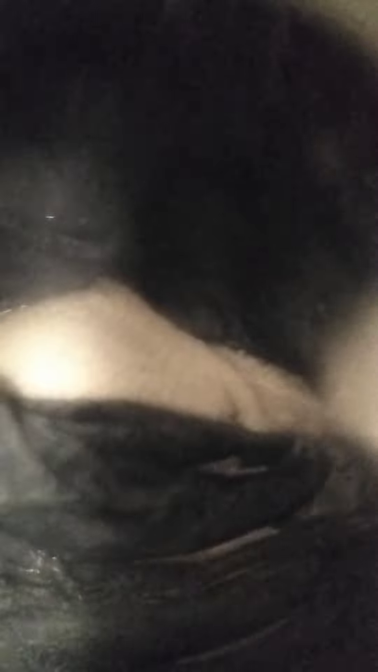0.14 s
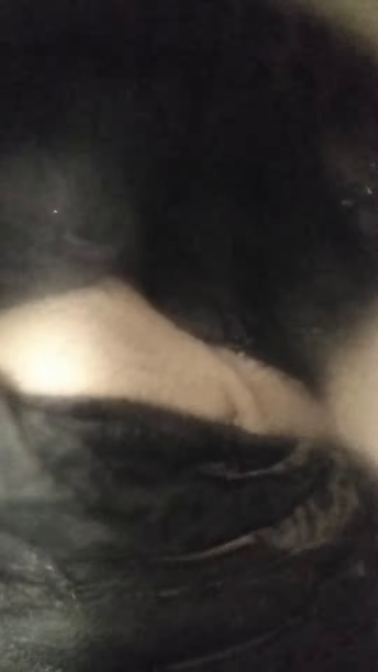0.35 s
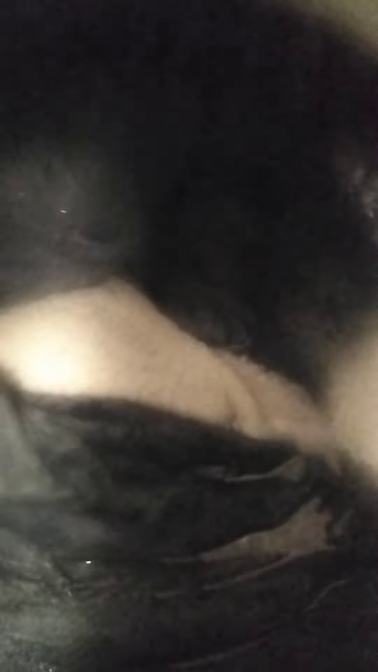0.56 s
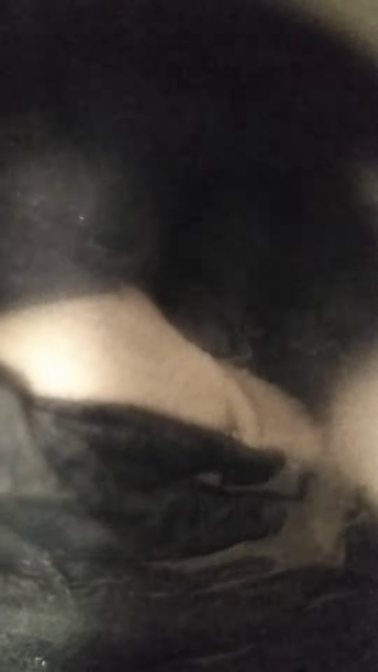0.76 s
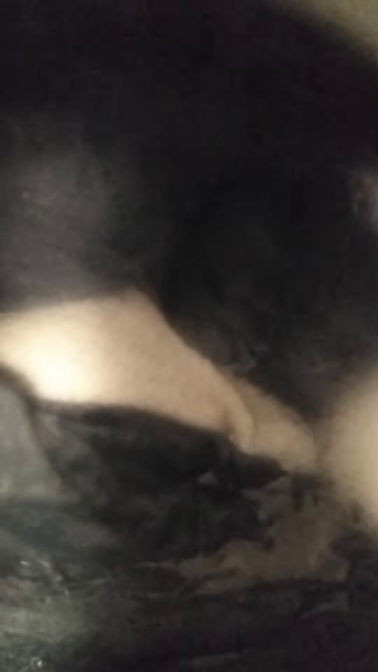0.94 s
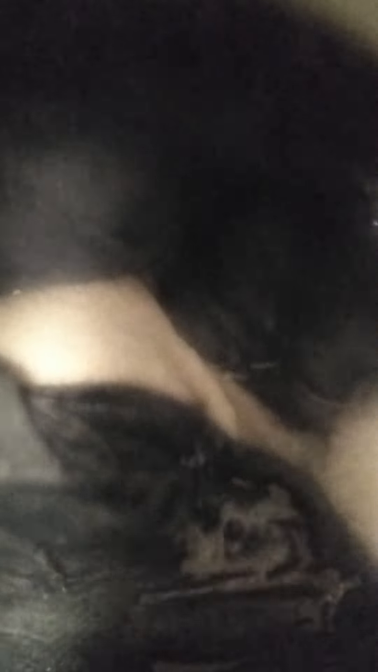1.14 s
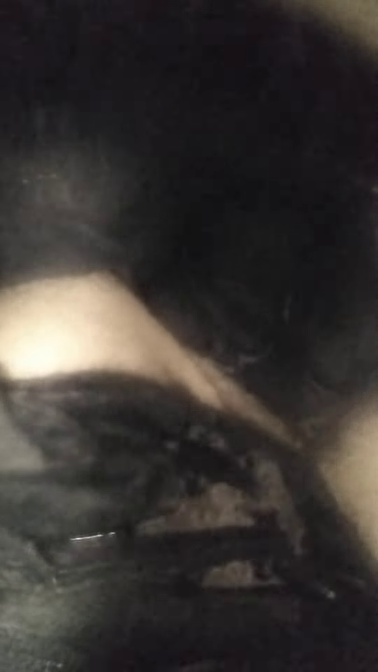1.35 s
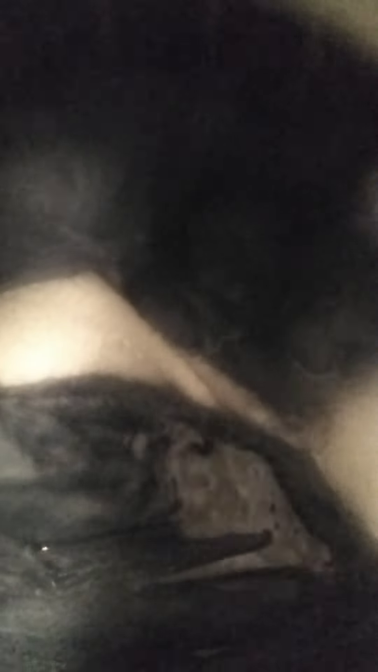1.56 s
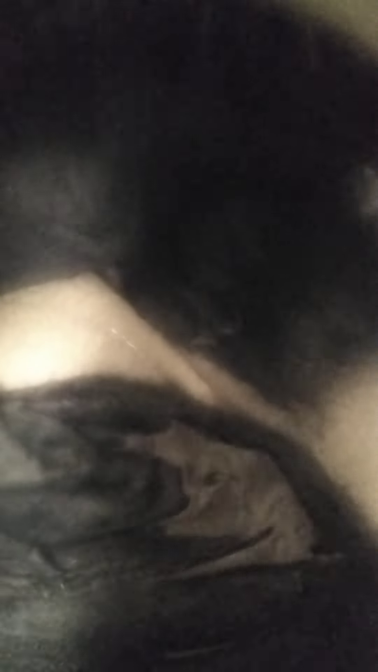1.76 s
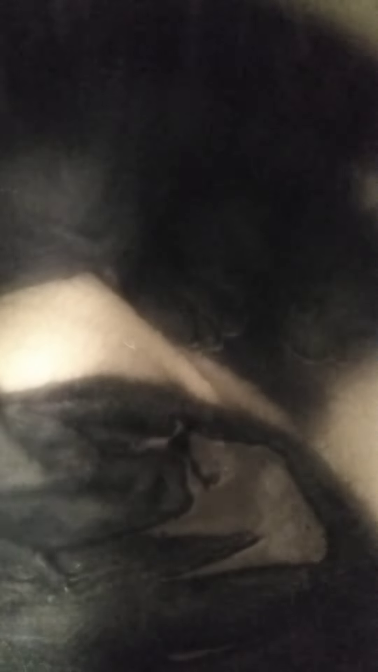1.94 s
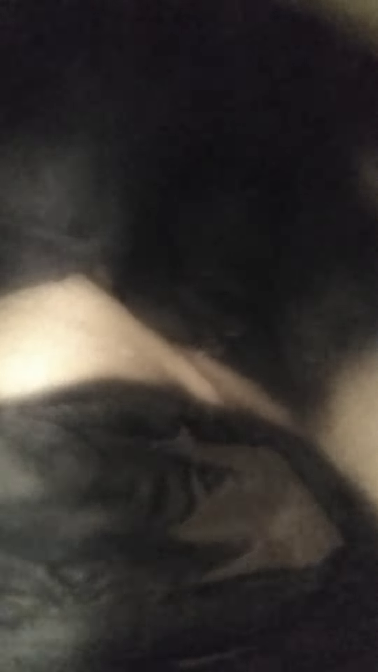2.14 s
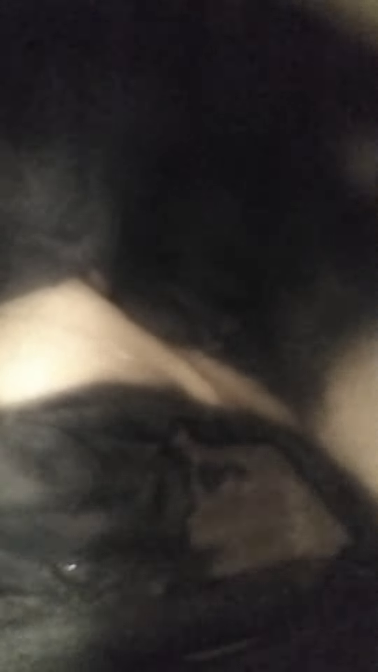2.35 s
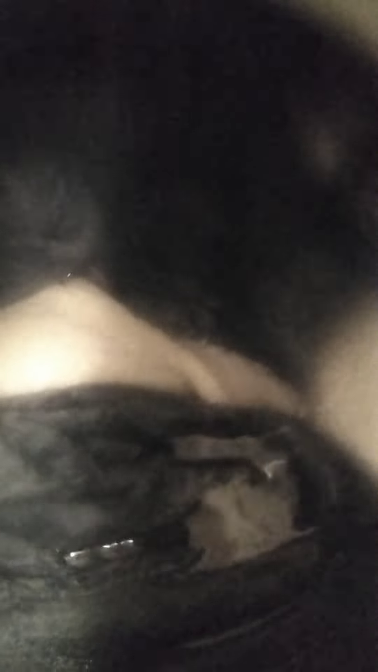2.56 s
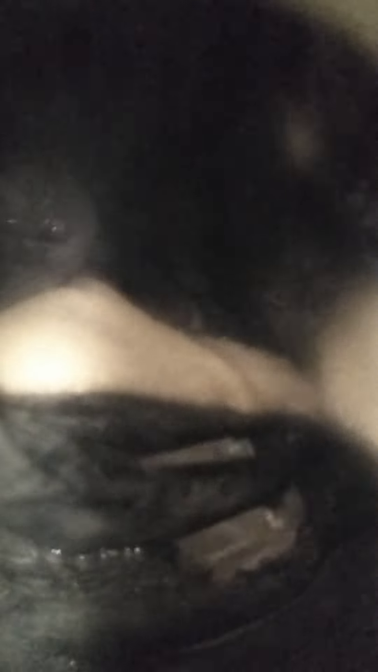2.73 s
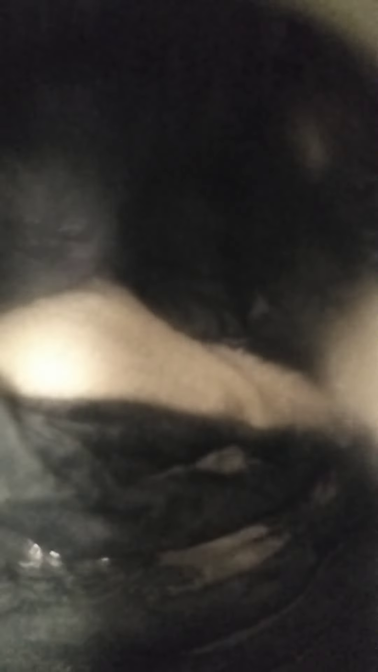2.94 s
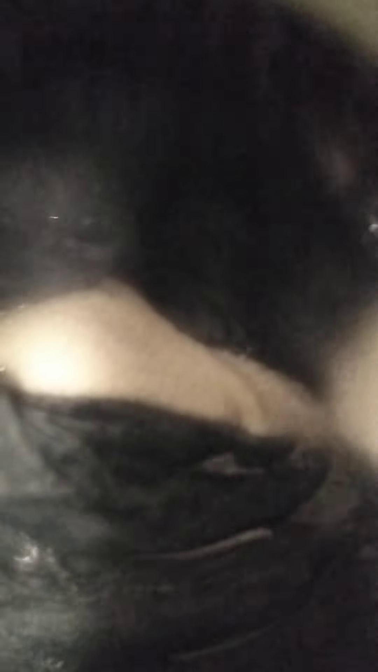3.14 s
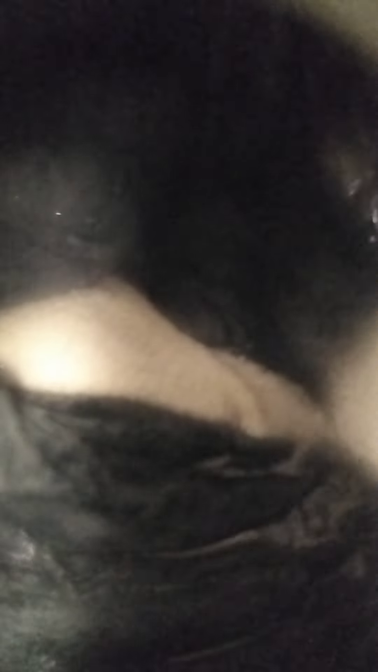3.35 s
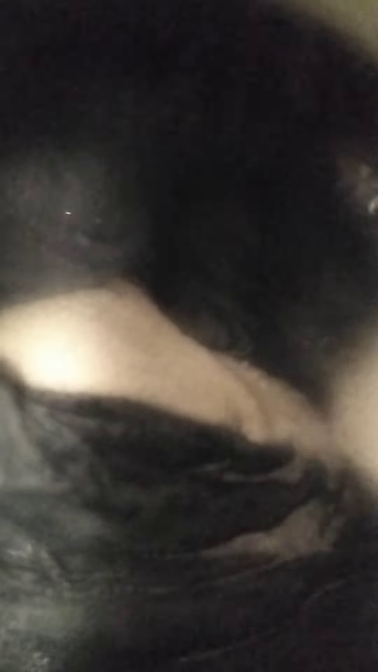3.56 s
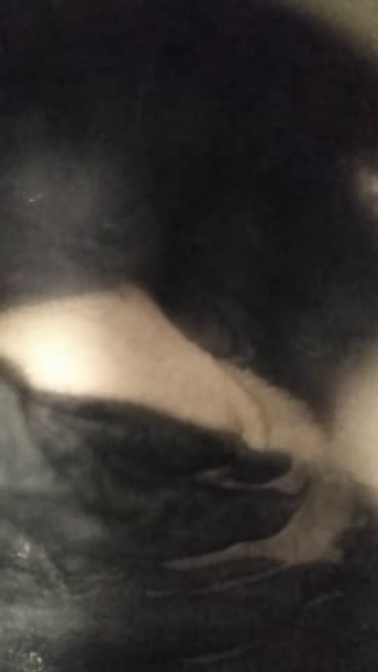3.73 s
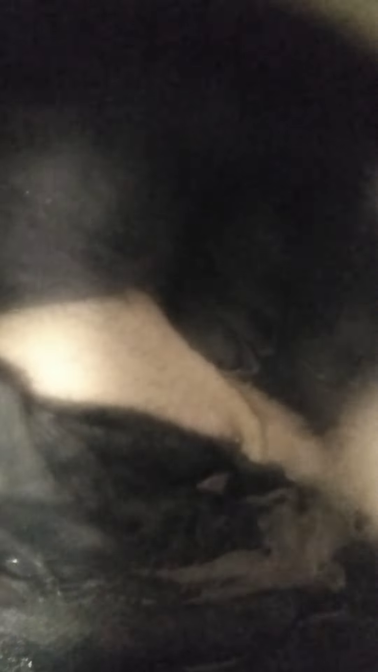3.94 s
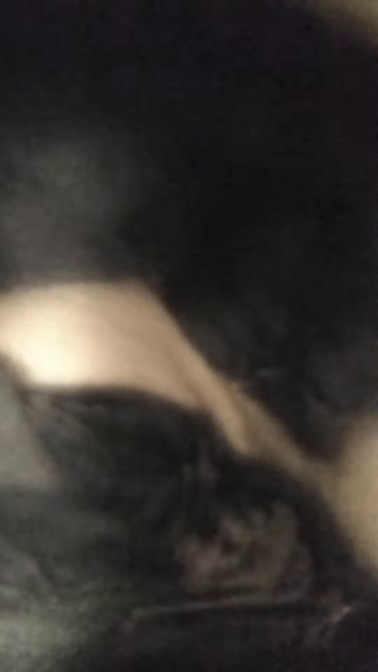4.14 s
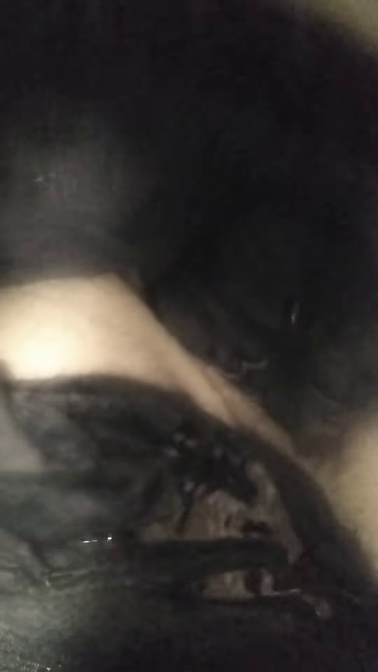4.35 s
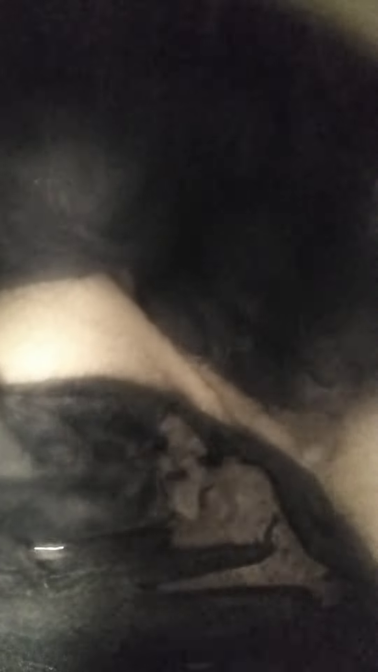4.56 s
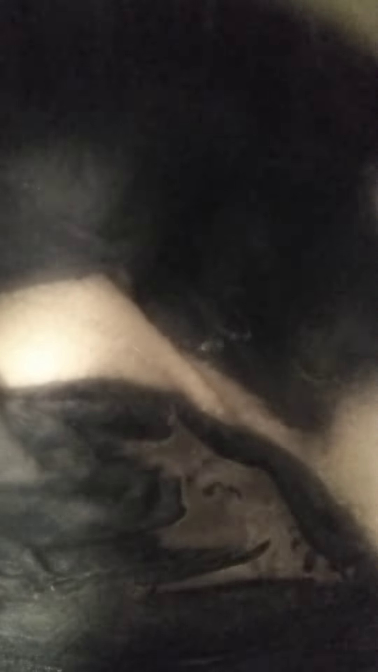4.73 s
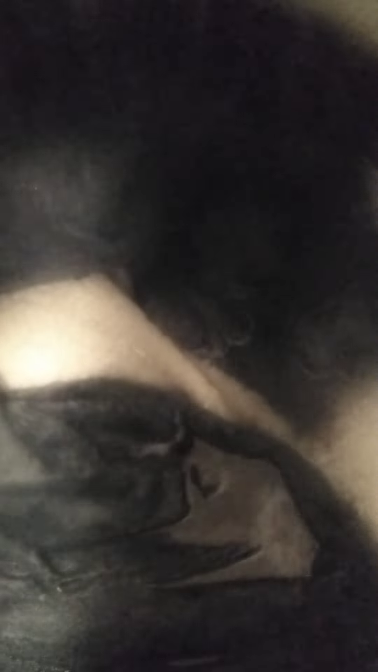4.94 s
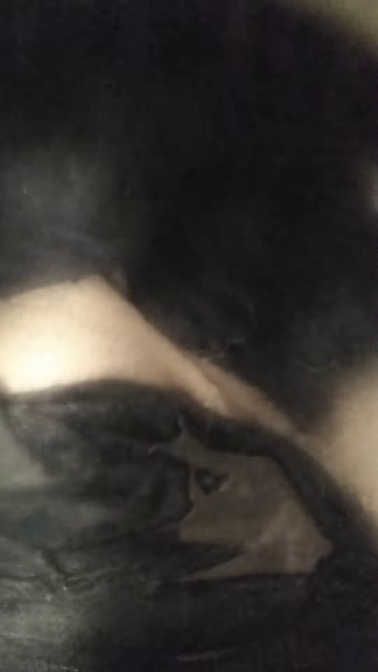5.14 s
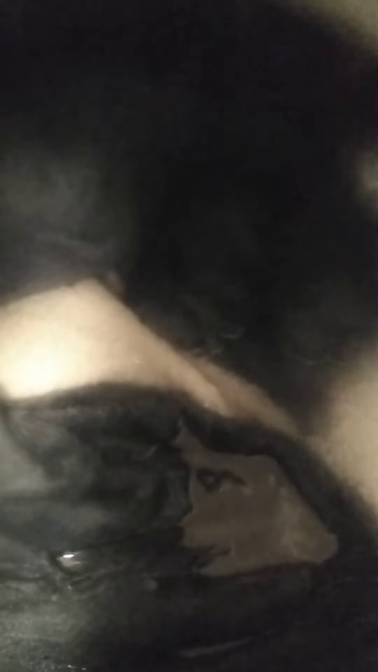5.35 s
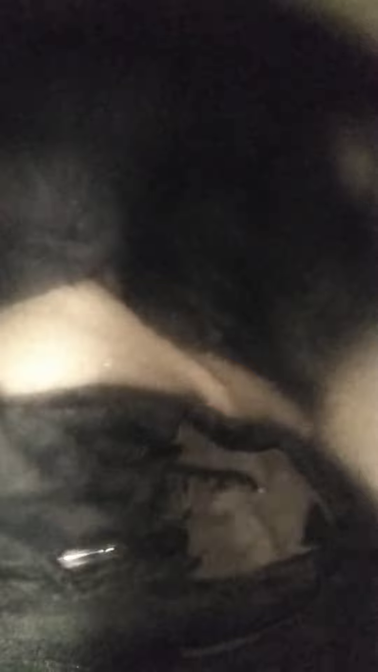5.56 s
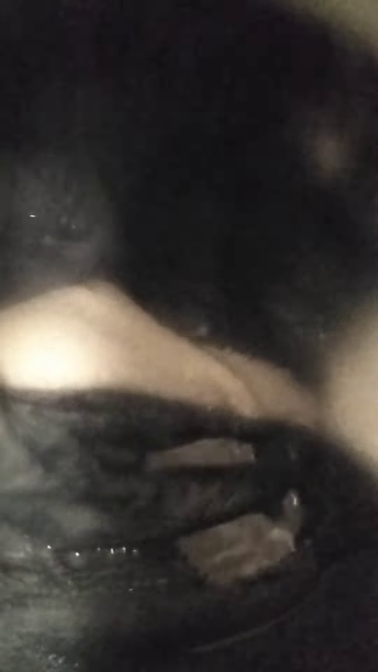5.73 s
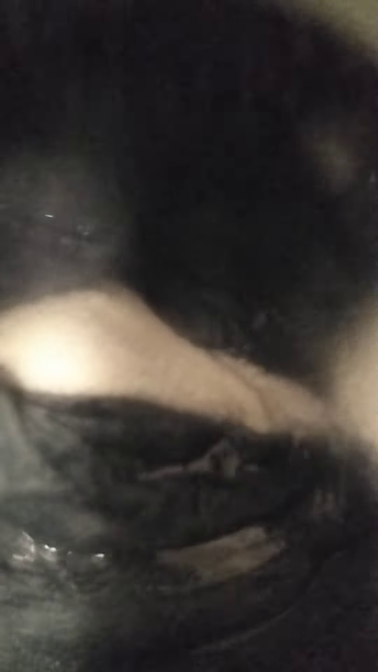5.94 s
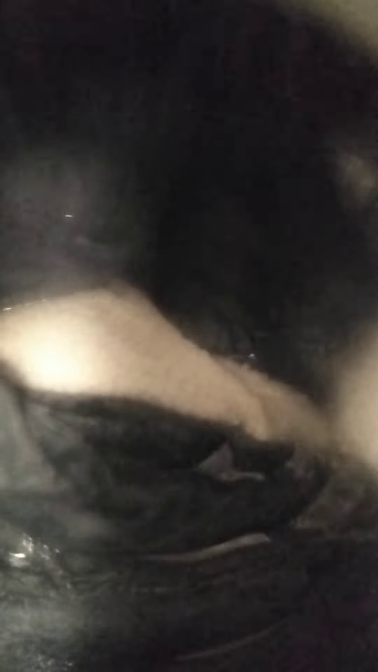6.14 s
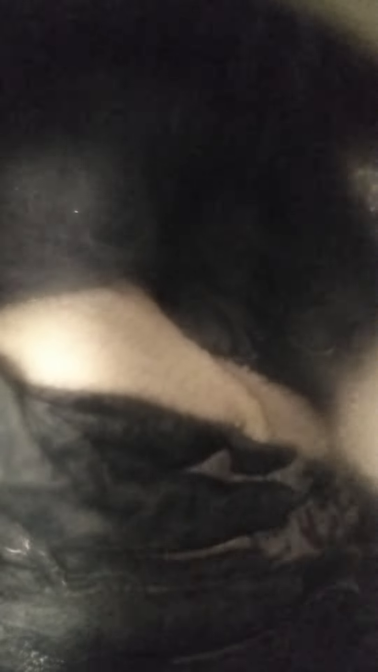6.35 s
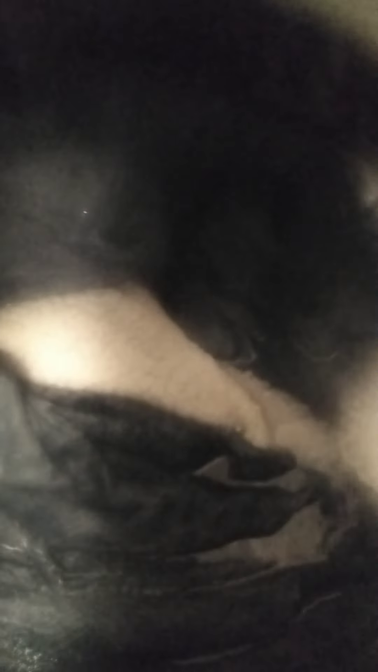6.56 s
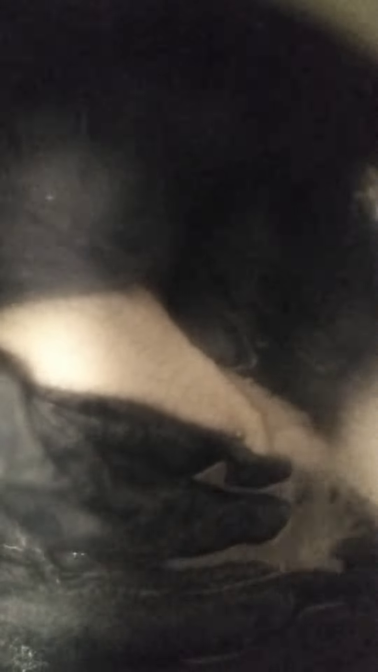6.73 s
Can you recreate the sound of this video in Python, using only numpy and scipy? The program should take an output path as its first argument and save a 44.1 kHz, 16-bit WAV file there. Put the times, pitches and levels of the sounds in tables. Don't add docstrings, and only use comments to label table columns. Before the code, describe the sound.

A washing machine agitates a heavy soaked blanket, heard very close at the lid. About every one and a half seconds the drive knocks in, water and cloth churn in the metal tub with a short hollow moan, the drive clunks out and the load slops to a halt. Drops then plink in the wet drum over a faint low hum.

```python
import sys
import numpy as np
from scipy import signal
from scipy.fft import rfft, irfft
from scipy.io import wavfile
from scipy.ndimage import uniform_filter1d

SR = 44100
rng = np.random.default_rng(int(sys.argv[2]) if len(sys.argv) > 2 else 0)


def gain_from_decibels(decibels):
    exponent = np.asarray(decibels, float) / 20
    return 10 ** exponent


def pcm_store(signal):
    levels = np.round(np.clip(np.atleast_2d(signal), -1, 1) * 32767)
    wavfile.write(sys.argv[1], SR, levels.astype(np.int16).T)


N = 303849
t = np.arange(N) / SR
STOP_S = 0.668
LOAD_LAG_S = 0.07
LURCH_T60_S, AIR_T60_S = 0.9, 0.3
PORT_LAG = 12


def walk(rate):
    k = int(SR / rate)
    held = np.repeat(rng.standard_normal(N // k + 1), k)
    return 1.302 * uniform_filter1d(uniform_filter1d(held, k), k)[:N]


def band(x, lo_hz, hi_hz):
    return signal.sosfilt(signal.butter(3, [lo_hz, hi_hz], "band", fs=SR, output="sos"), x)


def unit(x):
    return x / np.std(np.mean(x, axis=0))


def pair(alike):
    common, left, right = rng.standard_normal((3, N))
    shared = np.array([np.roll(common, PORT_LAG), common])
    return np.sqrt(alike) * shared + np.sqrt(1 - alike) * np.array([left, right])


# resonance in Hz, width in Hz, left lift in dB, right lift in dB.
PANELS = [(110.8, 25, 8.5, 11), (186, 29, -0.5, -1.5), (379.5, 25, 14.5, 4), (508.4, 27, -1.5, 6.5),
          (588, 17, 4.5, 4), (691, 27.3, 13, 9.5), (780, 28, 1.5, 0), (980, 30, 3.5, -3),
          (1075.5, 45, 7.5, 6.5), (1240, 40, 2.5, 1.5), (1434, 18, 6.5, 7), (1953, 50, 9.5, 3.5),
          (2390, 50, 5.5, 0), (3670, 46, 7.5, 7), (5640, 110, 9, 15), (6230, 110, 0, 11)]


def body(x, colour, panel_share=1.0):
    size = 2 ** 15
    hz = np.arange(size // 2 + 1) * SR / size + 1
    f, *sides = np.transpose(colour)
    db = np.array([np.interp(np.log(hz), np.log(f), side) for side in sides])
    for centre, width, *lift in PANELS:
        db = db + panel_share * np.outer(lift, 1 / (1 + (2 * (hz - centre) / width) ** 2))
    cepstrum = irfft(db * np.log(10) / 20, size)
    fold = np.r_[1, 2 * np.ones(size // 2 - 1), 1, np.zeros(size // 2 - 1)]
    response = irfft(np.exp(rfft(cepstrum * fold)), size)[:, :size // 2]
    return signal.fftconvolve(x, response, axes=1)[:, :N]


# motor on in seconds, load lurches in seconds, lurch in dB, slop at the stop in dB.
STROKES = [
    (-1.08, -1.15, -60, 0),
    (0.42, 0.345, -53, 0),
    (1.921, 1.885, -60, 0),
    (3.422, 3.35, -44.5, 0),
    (4.923, 4.8, -63, 7),
    (6.424, 6.322, -54, 0),
]
# seconds after switching on, speed as moan pitch in Hz, moan level in dB.
BACK = [(0.112, 236, -65), (0.2, 297, -47), (0.255, 322, -28), (0.29, 336, -32), (0.335, 328, -22.5),
        (0.365, 305, -44), (0.47, 292, -42), (0.53, 318, -36), (0.56, 215, -62)]
# seconds after switching on, speed as moan pitch in Hz, moan level in dB.
FORWARD = [(0.09, 190, -65), (0.2, 292, -50), (0.255, 316, -25.5), (0.29, 338, -31), (0.335, 326, -27),
           (0.37, 300, -44), (0.46, 292, -43), (0.525, 316, -31), (0.55, 225, -60)]


def motor():
    rows = []
    for k, (on_s, *_) in enumerate(STROKES):
        steps = (BACK, FORWARD)[k % 2]
        stroke = [(0, 0, -120), *steps, (0.64, 125, -120), (STOP_S + 0.03, 0, -120)]
        rows.extend(np.array(stroke) + (on_s, 0, 0))
    s, hz, db = np.transpose(rows)
    return np.interp(t, s, hz), np.interp(t, s, db)


def way(back_forward):
    starts = np.array(STROKES)[:, 0]
    k = np.searchsorted(starts, t) - 1
    return np.array(back_forward)[k % 2], t - starts[k]


def driven(db, law, lag_s=0):
    full_hz = 335
    hz = motor()[0]
    return gain_from_decibels(db) * (np.maximum(hz, np.interp(t - lag_s, t, hz)) / full_hz) ** law


def slop(db, rise_s, hold_s, t60_s, settle_db, settle_t60_s, heave=0):
    out = 0
    for on_s, _, _, slop_db in STROKES:
        after = np.clip(t - on_s - STOP_S, 0, None)
        late = np.clip(after - rise_s - hold_s, 0, None)
        fall = gain_from_decibels(-60 * late / t60_s) + gain_from_decibels(settle_db - 60 * late / settle_t60_s)
        out = out + gain_from_decibels(db + heave * slop_db) * np.clip(after / rise_s, 0, 1) * fall
    return out


def lurch(db, t60_s):
    out = 0
    for _, lurch_s, lurch_db, _ in STROKES:
        after = np.clip(t - lurch_s, 0, None)
        out = out + gain_from_decibels(db + lurch_db) * (1 - np.exp(-after / 0.008)) * gain_from_decibels(-60 * after / t60_s)
    return out


# time in seconds, peak in
# dB, relative thump in dB, ring t60 in ms.
KNOCKS = [(0.11, -72, 8, 200), (1.495, -78, 16, 150), (3.11, -72, 8, 200), (4.495, -68, 6, 150),
          (6.115, -76, 10, 200), (0.245, -56, 2.5, 88), (0.262, -59, -5, 90), (0.315, -44.5, -8, 120),
          (1.71, -84, 23, 150), (1.072, -37, -5, 89), (1.096, -35.5, -6, 96), (1.8, -69.5, 12, 200),
          (1.865, -60, 10, 200), (2, -52, 8, 97), (2.573, -36.5, -6, 140), (2.596, -31, -1, 100),
          (3.249, -54.5, -5, 150), (3.321, -44.5, 2, 140), (3.358, -43.5, -2.5, 110),
          (4.069, -36, -7.5, 140), (4.097, -34, -6, 120), (4.753, -57, 0, 110), (4.802, -51, -3, 190),
          (4.71, -84, 22, 150), (5.576, -36.5, -8, 90), (5.865, -63, -10, 400), (6.25, -68, 10, 300),
          (5.6, -33.5, -11, 120), (6.3, -54, -4.5, 100), (6.333, -56, 8, 150)]


def struck():
    ring, thump, blow, air = np.zeros((4, N))
    for s, db, thump_db, t60_ms in KNOCKS:
        i = int(s * SR) - SR // 250
        after = t[:min(SR // 2, N - i)]
        span = slice(i, i + len(after))
        decay = gain_from_decibels(-60e3 * after / t60_ms) + 0.13 * gain_from_decibels(-60 * after / 0.4)
        shape = gain_from_decibels(db) * (1 - np.exp(-after / 0.0035)) * decay
        ring[span] += shape
        thump[span] += shape * gain_from_decibels(thump_db) * (1 - np.exp(-after / 0.012))
        air[span] += gain_from_decibels(db + thump_db - 60 * after / AIR_T60_S) * (1 - np.exp(-after / 0.02))
        blow[int(s * SR)] = gain_from_decibels(db + 5)
    return ring, thump, blow, air


# pitch in Hz, left in dB, right in dB.
HUM = [(119.7, -67, -72.5), (201, -85, -79.5)]
# frequency in Hz, left in dB, right in dB.
ROOM_COLOUR = [(30, -105, -109), (60, -100, -100), (160, -103, -105), (250, -106, -99), (445, -106, -102),
               (690, -114, -112), (1200, -119, -115), (2480, -119, -114), (4000, -122, -119),
               (6000, -123, -117), (8950, -120, -122), (13000, -121, -123), (15500, -124, -126)]


def room():
    hum = 0
    for hz, left_db, right_db in HUM:
        sides_db = np.array([[left_db], [right_db]])
        hum = hum + gain_from_decibels(sides_db + 0.69 * walk(rate=5.1)) * np.sin(2 * np.pi * hz * t)
    floor = body(pair(0.99), ROOM_COLOUR, panel_share=0.43)
    own = body(pair(0), ROOM_COLOUR, panel_share=0.44)
    trickle = gain_from_decibels(-5.5 + 3.5 * walk(rate=35)) * band(own, 250, 4200)
    return hum + np.sqrt(SR / 2) * (gain_from_decibels(-1.5) * band(floor, 19, 280) + trickle + band(own, 4300, 17000))


# frequency in Hz, left in dB, right in dB.
CHURN_COLOUR = [(30, -101, -98.5), (60, -84.5, -76), (112, -78.5, -73.5), (200, -71.5, -70),
                (447.6, -76, -63.5), (600, -77, -78), (753, -81, -71), (1138, -78.5, -79.5),
                (1510, -94, -89.5), (2200, -100, -102), (3500, -108, -105), (5500, -116, -109),
                (7600, -119, -119), (12000, -118, -123)]


def churn():
    rumble_way_db, _ = way((2.5, -0.5))
    rumble = driven(-52 + rumble_way_db, 1.2, LOAD_LAG_S) + lurch(2, LURCH_T60_S)
    rumble = rumble + slop(-52.5, 0.02, 0.09, 0.42, -20, 0.9, heave=1)

    tub_slop = slop(-46, 0.015, 0.005, 0.2, -13, 0.85)
    tub = driven(-44.5, 1.4, LOAD_LAG_S) + tub_slop + lurch(6, AIR_T60_S)

    slope_db_per_s, since_s = way((-14, 5))
    ring = driven(-44.5 + slope_db_per_s * (since_s - 0.3), 2.5)
    ring = ring + gain_from_decibels(-3) * tub_slop + lurch(-9, AIR_T60_S)

    spray = driven(-71, 3.2, lag_s=0.12)
    hiss = driven(-65.5, 3.2) + spray + slop(-63, 0.015, 0.012, 0.3, -6, 0.95)

    heard = body(gain_from_decibels(1.4 * walk(rate=150)) * pair(0.48), CHURN_COLOUR)
    out = rumble * gain_from_decibels(1.8 * walk(rate=12)) * unit(band(heard, 25, 280))
    out = out + tub * gain_from_decibels(1.5 * walk(rate=30)) * unit(band(heard, 368, 620))
    out = out + ring * gain_from_decibels(1.2 * walk(rate=30)) * unit(band(heard, 620, 1500))
    return out + hiss * gain_from_decibels(1.1 * walk(rate=20)) * unit(band(heard, 1560, 7300))


def pocket():
    pocket_hz, width_hz, gulp_hz = 312.6, 55, 320
    hz, db = motor()
    phase = 2 * np.pi * np.cumsum(hz * (1 + 0.0087 * walk(rate=45))) / SR

    off_hz = 2 * hz - gulp_hz
    gulp_db = way((-37, -43))[0] + np.minimum(0.14 * off_hz, -0.06 * off_hz)
    gulp = uniform_filter1d((np.gradient(hz) > 0) * gain_from_decibels(gulp_db), SR // 100)
    tone = np.sqrt(2) * (gain_from_decibels(db) * np.sin(phase) + gulp * np.sin(2 * phase))

    knocked = gain_from_decibels(-4) * struck()[3]
    rest = driven(-46, 0.8, LOAD_LAG_S) + slop(-48, 0.012, 0.02, 0.25, -10, 1.3)
    rest = rest + lurch(15, AIR_T60_S) + knocked
    b, a = signal.iirpeak(pocket_hz, pocket_hz / width_hz, SR)
    noise = signal.lfilter(b, a, signal.lfilter(b, a, pair(0.4)))
    sides = gain_from_decibels(np.array([[-13], [5]]))
    return sides * (tone + rest * noise / np.std(noise))


# time in seconds, peak in dB, pitch in Hz, left minus right in dB.
DROPS = [(0.0553, -67, 2460, -3), (0.162, -63.5, 2840, -12), (1.2072, -55, 3380, -8),
         (1.293, -57.5, 2000, -4), (1.3058, -59.5, 3420, -16.5), (1.4341, -74, 4210, -3),
         (1.591, -69.5, 3440, -12), (1.6225, -63, 3140, -11), (2.4438, -56, 3150, -7),
         (3.0654, -70, 3430, -2.0), (3.1244, -67, 3860, -9), (3.3764, -56, 4120, -1.5),
         (4.2657, -59.5, 3740, -13.0), (4.279, -63, 3900, -12), (4.309, -63, 3120, -8.0),
         (4.4378, -68.5, 3400, -9), (4.4891, -61.5, 3680, -6), (4.6229, -72, 2900, -7.0),
         (4.6478, -74, 3260, -5), (5.516, -56.5, 4090, -5), (5.655, -57.5, 2970, -6),
         (5.7182, -57, 3610, -11), (5.8036, -70, 4110, -20), (5.8247, -66, 4090, -11),
         (5.8589, -55.5, 4030, -9), (5.8894, -61, 3900, 2), (6.111, -68, 2890, -3.5), (2.8, -68, 1600, -3),
         (3.42, -66, 2800, -4), (5.93, -64, 2300, -3)]
# time in seconds, peak in dB, pitch in Hz, left minus right in dB.
DROPLETS = [(0.0702, -72, 5970, -9), (0.1181, -72, 4900, -5), (0.161, -72, 5630, -9),
            (0.4194, -66, 6270, -5.5), (0.93, -61.5, 6190, -5.5), (1.069, -63, 5300, -10.5),
            (1.1268, -62.5, 6800, -11), (1.204, -69, 4850, -15), (1.2486, -63.5, 4720, -16),
            (1.2694, -71, 6550, -11.5), (1.3447, -65, 5136, -17), (2.4865, -63, 5580, -14),
            (2.6776, -61, 5110, -14), (2.7237, -65, 5540, -13.0), (2.7546, -66, 6340, -14.0),
            (2.7807, -62.5, 5900, -17), (3.0674, -70, 6410, -5), (3.0985, -66.5, 5570, -9),
            (3.3903, -61.5, 5500, -9), (3.9796, -66, 5150, -17), (4.2118, -70, 6510, -9),
            (4.237, -64, 5660, -16), (4.5965, -71, 7000, -3), (4.9267, -70, 6180, -3.0),
            (5.7568, -70, 4600, -10.5), (6.4339, -63.5, 5670, -3)]


def drops():
    tail_t60_s, echo_db, splash_db = 0.16, -8, -11.5
    out = np.zeros((2, N))
    after = np.arange(int(0.3 * SR)) / SR
    for s, db, hz, pan_db in DROPS + DROPLETS:
        note = np.sin(2 * np.pi * hz * after * (1 + 3.3 * after)) * np.exp(-after / 0.0034)
        noise = rng.standard_normal((2, 2, len(after)))
        echo = band(noise[0], hz * 0.94, hz * 1.076)
        splash = band(noise[1], hz * 0.7, min(hz * 1.63, 7300))
        tail = gain_from_decibels(echo_db) * echo / np.std(echo) + gain_from_decibels(splash_db) * splash / np.std(splash)
        tail = tail * (1 - np.exp(-after / 0.0015)) * gain_from_decibels(-60 * after / tail_t60_s)
        i = int(s * SR)
        sound = (note * np.array([[-0.6], [1]]) + tail)[:, :N - i]
        sides_db = np.array([[pan_db], [-pan_db]]) / 2
        out[:, i:i + len(after)] += gain_from_decibels(db + 0.5 + sides_db) * sound
    return out


# frequency in Hz, left in dB, right in dB.
KNOCK_COLOUR = [(40, -93.5, -81), (100, -78.5, -74), (200, -71.5, -71), (440, -72.5, -57.5),
                (636, -77, -77.5), (794, -72.5, -70), (1120, -70.5, -64.5), (1400, -77.5, -76),
                (2040, -83.5, -86.5), (2940, -94, -91.5), (4600, -109, -100), (7000, -118, -111)]


def knocks():
    ring, thump, blow, _ = struck()
    reference = body(pair(0.5), KNOCK_COLOUR)
    unit_gain = np.std(band(reference, 810, 2500).mean(axis=0))
    blows = np.array([np.roll(blow, PORT_LAG), blow])
    high = band(body(blows + ring * pair(0.39), KNOCK_COLOUR), 400, 4300)
    low = band(body(thump * pair(0.7), KNOCK_COLOUR), 30, 330)
    return gain_from_decibels(-6) * (high + low) / unit_gain


def whistle():
    armed_s, released_s, whistle_hz = 1.3, 0.3, 5680
    since_s = way((0, 0))[1]
    on = uniform_filter1d(1.0 * ((since_s > armed_s) | (since_s < released_s)), SR // 30)
    line = band(pair(0.3), whistle_hz - 22, whistle_hz + 22)
    sides_db = np.array([[-5], [4]])
    return on * gain_from_decibels(-91 + 3 * walk(rate=15) + sides_db) * line / np.std(line)


def inverter():
    gain = driven(-81, 2.2) + gain_from_decibels(-100.5)
    hiss = band(pair(0.05), 15450, 15900) + 0.12 * band(pair(0.05), 14500, 14660)
    flutter_db = 2.7 * walk(rate=25) + 2.5 * walk(rate=90)
    sides_db = np.array([[9], [-6]])
    return gain * gain_from_decibels(flutter_db + sides_db) * hiss / np.std(hiss)


def scene():
    return room() + churn() + pocket() + drops() + knocks() + whistle() + inverter()


def low_pass(x):
    return signal.sosfilt(signal.butter(12, 15970, fs=SR, output="sos"), x)


def record(dry):
    top_hz = 15770
    cut = signal.sosfilt(signal.ellip(10, 0.2, 70, top_hz, fs=SR, output="sos"), dry)
    return low_pass(cut)


dry = scene()
out = record(dry)
pcm_store(out)
```